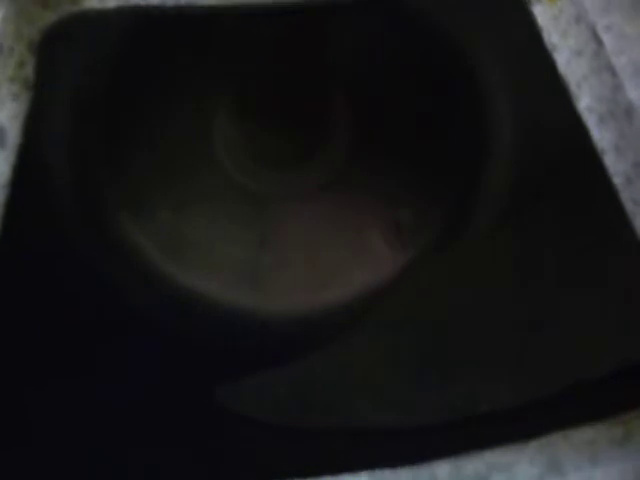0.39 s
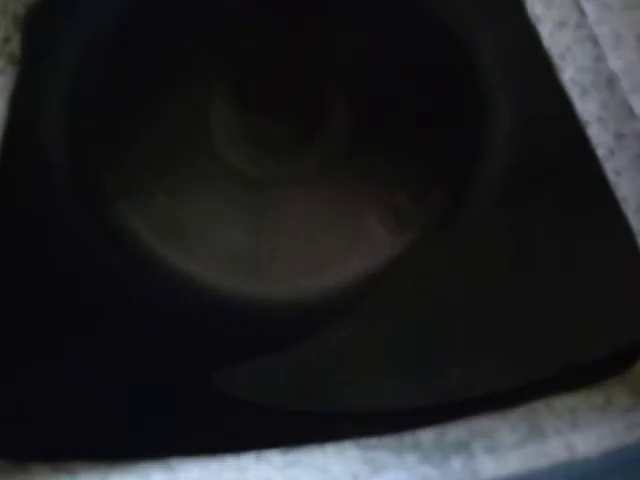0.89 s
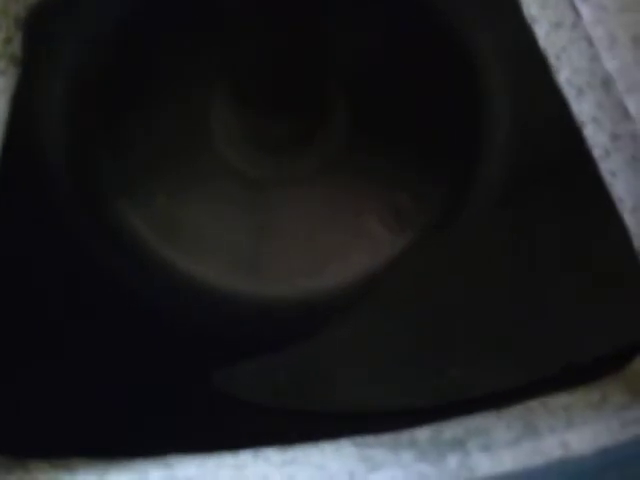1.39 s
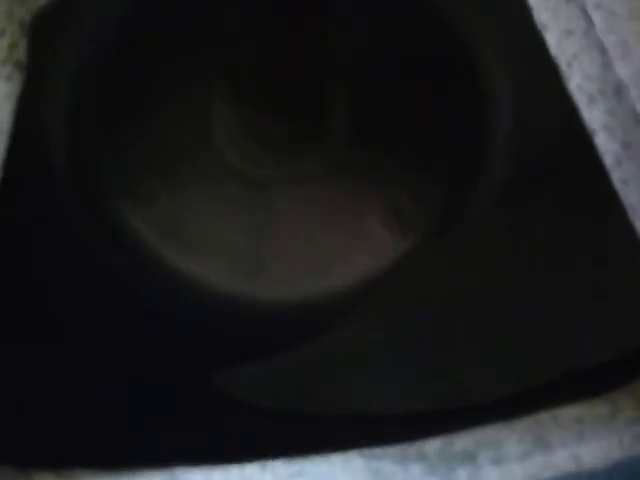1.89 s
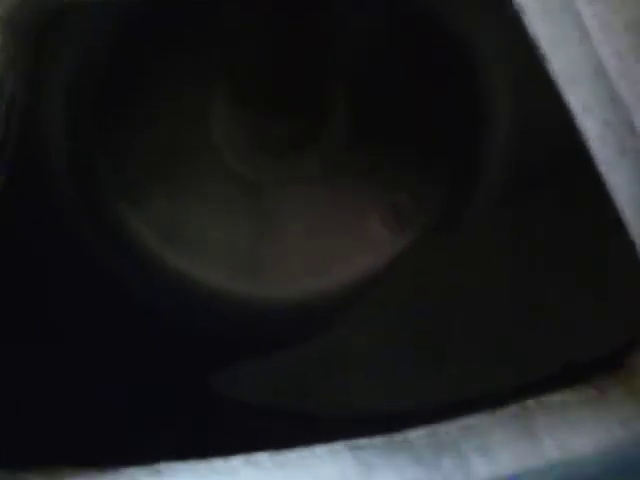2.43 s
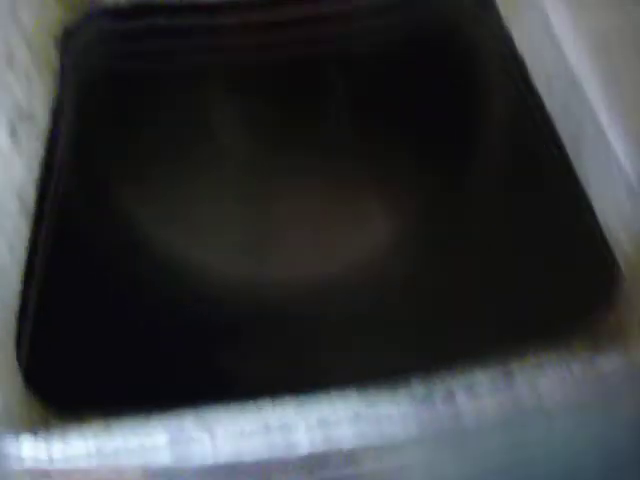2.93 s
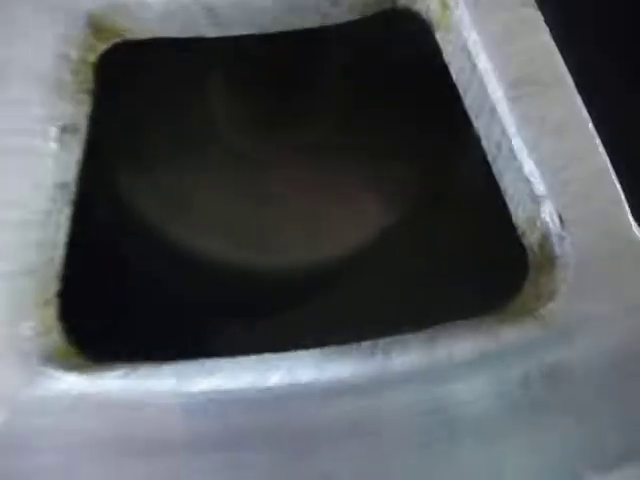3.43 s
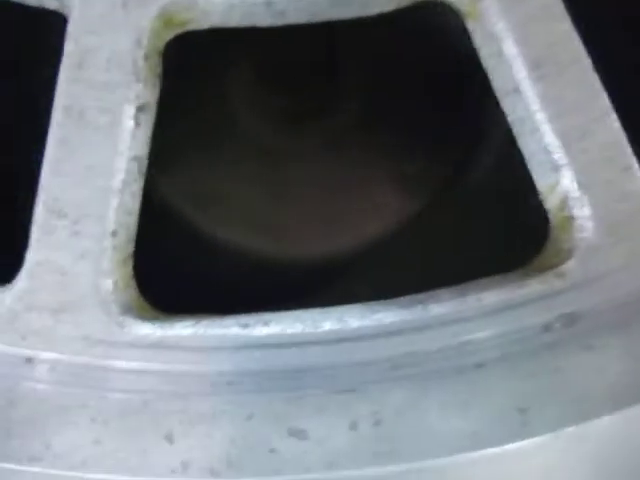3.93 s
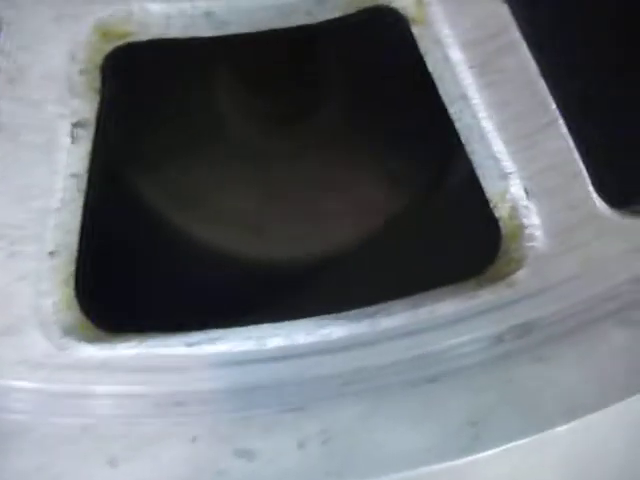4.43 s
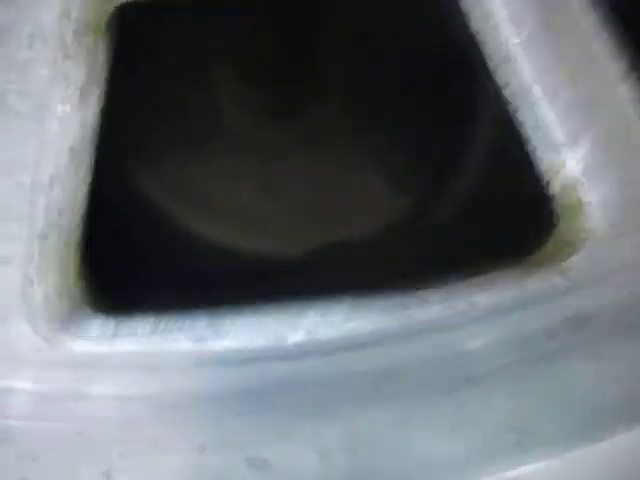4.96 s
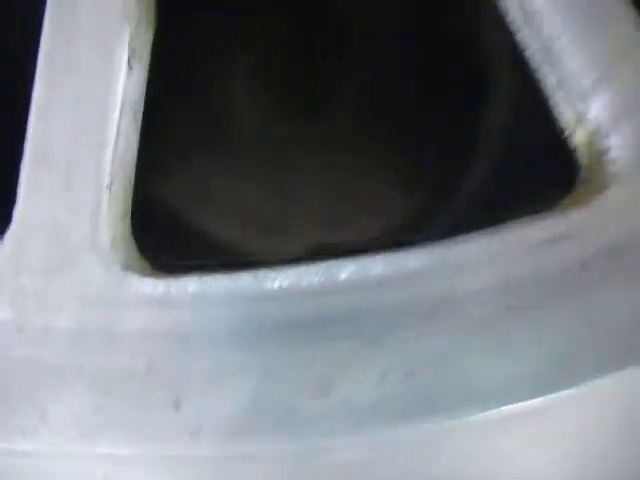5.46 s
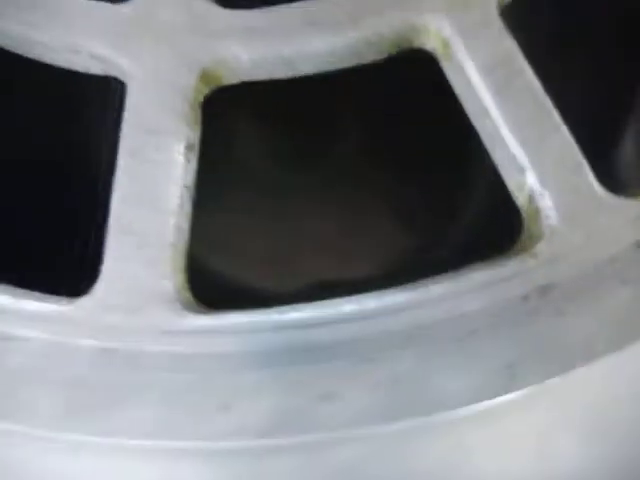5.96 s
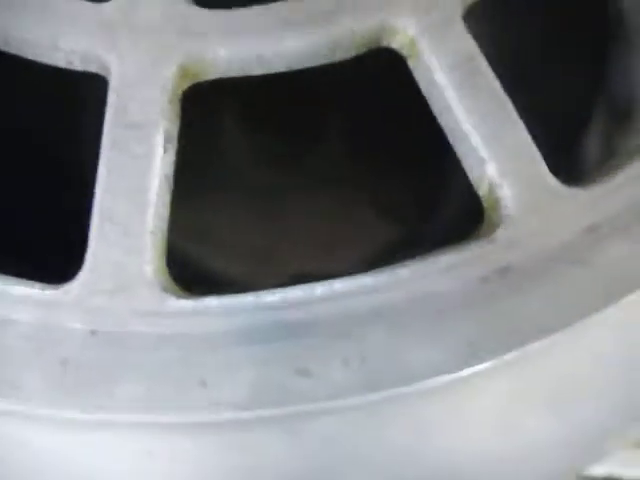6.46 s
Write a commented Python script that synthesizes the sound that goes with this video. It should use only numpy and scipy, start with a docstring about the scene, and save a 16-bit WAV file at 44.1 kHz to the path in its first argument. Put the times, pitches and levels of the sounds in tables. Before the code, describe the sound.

A handheld small microphone sits near a machine's metal vent in a workshop. Its motor runs at constant speed: low beating hum, resonant airy whirr, fine whistling whine that swells and fades. Short dull wind bumps and lumpy low rumble hit the microphone throughout, strongest in the last second and a half. A single dry tick of loose metal occurs past the middle. Bass and extreme treble are thin.

```python
"""A running cutter machine hums: a few close low tones beat, so the hum throbs.
Further steady low tones, a whirr of noise through the ringing housing and a fine whine of
shaft multiples belong to the machine too, and change in level with the nearness of the microphone.
A loose part ticks once against metal, made from quick ringing modes and a noise crack.
Moving air buffets the microphone: short low bursts over a lumpy stream of low noise."""
import sys
import numpy as np
from scipy import signal
from scipy.fft import rfft, irfft
from scipy.io import wavfile
from scipy.ndimage import uniform_filter1d

SR = 44100
rng = np.random.default_rng(int(sys.argv[2]) if len(sys.argv) > 2 else 0)


def makeup_ratio(level_db):
    """Linear amplitude ratio for a level in decibels (20 dB per factor of ten)."""
    decades = np.asarray(level_db, float) / 20
    return 10 ** decades


def generate_wav(signal):
    """Clip the signal to [-1, 1] and save it as 16-bit WAV at the path in sys.argv[1]."""
    frames = np.transpose(np.atleast_2d(signal))
    scaled = np.clip(frames, -1, 1) * 32767
    pcm = np.round(scaled).astype(np.int16)
    wavfile.write(sys.argv[1], SR, pcm)


N = 291060  # length in samples
SHAFT_HZ = 24.871  # turns of the shaft per second
IN_STEP_S = 0.44  # moment when all the hum tones are in step
FLICKER_DB = 0.6  # rms flicker of the whirr's treble

# The hum and its close neighbours, one list each: pitch_hz; level_db (rms)
HUM_HZ = [124.36, 123.08, 126.97, 128.32, 148.0, 149.2]
HUM_LEVEL_DB = [-28.5, -34.5, -40.5, -49, -43.5, -40.5]
# Steady low tones of shaft, blades and windings, one list each: pitch_hz; level_db (rms)
LOW_TONE_HZ = [298.46, 299.93, 517.2, 572, 590.46, 596.52, 599.84, 621.83, 624.74, 796.46, 846.21, 871.06,
               895.6, 920.82]
LOW_TONE_LEVEL_DB = [-51, -52, -45, -51, -48, -42, -43, -46, -44, -52, -43, -47, -56, -53]
# Nearness of the microphone, used relative to its average: time_s, level_db
NEARNESS = [(0, -35), (0.35, -32.5), (1.2, -31.5), (1.9, -32), (2.3, -33), (5.1, -33.5), (5.55, -37),
            (5.8, -36), (6.6, -36)]
# Colour of the whirr of air and bearings, relative: pitch_hz, level_db (per Hz)
WHIRR_COLOUR = [(30, -32.5), (80, -17.5), (140, -6.5), (300, -24.5), (450, -27.5), (700, -30), (950, -30),
                (1200, -23), (2100, -27), (2700, -30.5), (4500, -40), (5600, -46.5), (6600, -54.5),
                (7400, -68), (8500, -110)]
# Ringing modes of the housing, same order in both: pitch_hz; then width_hz, boost_db
HOUSING_HZ = [517, 615, 760, 812, 1065, 1160, 1220, 1330, 1410, 1450, 1580, 1715, 1745, 1895, 2090, 2300]
HOUSING_MODES = [(13.9, 23.5), (13.5, 27), (10, 5.5), (44.3, 20), (35, 13), (30, 6.5), (50, 6), (25, 4),
                 (20, 2.5), (49, 7), (17.7, 6), (25, 4), (15, 11), (26, 6.5), (40, 4.5), (60, -3.5)]
# Treble of the whirr against its body: time_s, level_db
WHIRR_TREBLE = [(0, -1), (1.499, 0.5), (3.4, 1), (4.901, -1.5), (5.4, 5.5), (5.55, -0.5), (6.6, -1)]
# General level of the whine, before random unevenness: pitch_hz, level_db (rms of each tone)
WHINE_COLOUR = [(2300, -82), (2550, -73), (2760, -66), (2880, -73), (2990, -67), (3300, -69), (3800, -74),
                (4300, -71), (5000, -78), (5500, -80), (6200, -86), (7000, -99), (7400, -110)]
# Strongest whine tones, replacing the general level: order (multiple of the shaft rate), level_db (rms)
STRONG_ORDERS = [(107, -54), (108, -50), (109, -58), (111, -62), (123, -61), (124, -63), (126, -60),
                 (129, -57), (130, -61), (133, -63), (137, -61), (138, -60), (139, -62), (140, -64),
                 (143, -65), (145, -63), (153, -65), (164, -68), (171, -66), (172, -65), (192, -67),
                 (208, -69), (209, -71), (210, -70)]
# Swell of the lowest, whistling whine tones, used relative to its average: time_s, level_db
WHISTLE_SWELL = [(0.0, -57), (0.35, -51.5), (1.0, -52), (1.7, -50), (3.2, -54), (3.4, -50.5), (4.65, -49.5),
                 (5.6, -60), (6.6, -62)]
# Tick of the loose part: start_s, level_db (peak)
TICKS = [(4.2394, -11)]
# Ringing modes of the tick, relative levels: pitch_hz, level_db, t60_s (time to fall 60 dB)
TICK_MODES = [(1060, -4.5, 0.025), (1400, -6, 0.022), (1606, 3, .025), (1850, -2.5, 0.028),
              (2290, -3.5, 0.016), (5850, -13, .04)]
# Large eddies, some overlapping or run together into one burst:
# middle_s, level_db (highest short-term rms), pitch_hz, nominal length_ms
THUMPS = [(0.353, -20, 234, 16), (0.477, -28, 230, 6), (0.634, -31, 239, 13), (0.808, -26, 260, 30),
          (0.889, -20.5, 270, 3.5), (1.321, -17, 270, 53), (1.4, -26.5, 265, 16), (1.618, -22.5, 249, 25),
          (1.741, -25.5, 248, 18), (1.93, -22, 218, 23), (2.127, -11.5, 250, 14), (2.319, -23, 259, 18),
          (2.463, -21.5, 255, 11), (2.499, -16.5, 308, 5.9), (2.92, -18, 243, 35), (2.949, -21.5, 248, 9.2),
          (3.111, -21.5, 217, 7), (3.142, -24.5, 300, 24), (3.383, -26, 198, 9.8), (3.471, -25, 271, 24),
          (3.763, -26, 265, 12), (3.805, -27, 333, 14), (3.987, -15.5, 214, 7.1), (4.067, -21.5, 230, 11),
          (4.107, -13, 236, 8.1), (4.175, -23.5, 200, 11), (4.346, -25.5, 320, 31),
          (4.406, -20.5, 250, 8.9), (4.847, -27, 260, 53), (5.014, -20.5, 230, 3), (5.131, -16, 240, 8.8),
          (5.141, -12.5, 407, 5.3), (5.153, -15.5, 230, 22), (5.296, -20, 253, 11), (5.343, -16, 264, 10),
          (5.373, -16.5, 250, 15), (5.399, -19, 320, 27), (5.419, -14, 330, 8.9), (5.456, -19, 394, 11),
          (5.485, -14, 224, 10), (5.517, -18, 372, 14), (5.553, -20, 230, 16), (5.637, -25, 208, 14),
          (5.714, -19, 254, 26), (5.741, -22.5, 236, 20), (5.944, -18, 231, 45), (5.992, -27, 240, 13),
          (6.034, -18, 258, 7.9), (6.058, -16.5, 322, 9.5), (6.085, -21.5, 270, 8.6),
          (6.126, -16.5, 235, 18), (6.262, -22, 312, 3.8), (6.297, -20.5, 220, 25),
          (6.417, -17.5, 227, 7.2)]
# Air stream on the microphone: time_s, level_db
GUST_LEVEL = [(0.0, -46), (0.5, -38), (1.05, -48), (1.3, -38), (1.7, -32.5), (1.97, -31.5), (2.6, -33.5),
              (3.05, -52), (3.95, -34.5), (4.5, -49.5), (4.95, -27.5), (5.2, -34), (5.4, -23),
              (5.53, -26.5), (5.7, -36), (6.05, -24.5), (6.2, -40), (6.36, -25), (6.6, -35.5)]
# Colour of the air stream, relative: pitch_hz, level_db (per Hz)
GUST_COLOUR = [(20, -37.5), (60, -14), (140, 6), (225, -2), (400, -12), (600, -18.5), (900, -33),
               (1500, -47.5), (3000, -90)]


def evened(x):
    """Scales a signal to rms 1."""
    return x / np.sqrt(np.mean(x ** 2) + 1e-20)


def read_colour(points, hz):
    """Reads a spectrum in between its points, on a log-frequency axis."""
    point_hz, value = np.transpose(points)
    return np.interp(np.log(hz + 1), np.log(point_hz + 1), value)


def curve(rows):
    """Reads a control curve at every sample."""
    time_s, value = np.transpose(rows)
    return np.interp(np.arange(N) / SR, time_s, value)


def steady_tones(pitch_hz, level_db, waver, drift_hz):
    """Tones of random phase; a narrow random skirt makes each one swell and fade by itself."""
    side = np.arange(-60, 61)  # neighbouring spectrum bins
    skirt = 1 / (1 + (side * SR / N / drift_hz) ** 2)
    real, imag = rng.standard_normal((len(pitch_hz), len(side), 2)).T
    shape = waver * (real + 1j * imag).T * skirt / np.sqrt(2 * np.sum(skirt ** 2))
    # the steady part sits in the middle bin
    shape += (side == 0) * np.exp(2j * np.pi * rng.random((len(pitch_hz), 1)))
    level = makeup_ratio(np.asarray(level_db))[:, None] / np.sqrt(1 + waver ** 2)
    bins = np.round(np.asarray(pitch_hz) * N / SR).astype(int)[:, None] + side
    spectrum = np.zeros(N // 2 + 1, complex)
    np.add.at(spectrum, bins, shape * level)
    return irfft(spectrum, N) * N / np.sqrt(2)


def hum():
    """Close tones fall in and out of step, so the hum throbs a little faster than once a second."""
    t = np.arange(N) / SR - IN_STEP_S
    return sum(np.sqrt(2) * makeup_ratio(level_db) * np.cos(2 * np.pi * pitch_hz * t)
               for pitch_hz, level_db in zip(HUM_HZ, HUM_LEVEL_DB))


def low_tones():
    """Shaft, blades and windings sound steady low tones that waver slightly."""
    return steady_tones(LOW_TONE_HZ, LOW_TONE_LEVEL_DB, waver=0.35, drift_hz=1.5)


def whirr():
    """Noise of air and bearings rings the housing, in drifting patches, pulsing once a turn."""
    size, hop = 4096, 1024  # samples
    frames, hz = N // hop + 5, np.fft.rfftfreq(size, 1 / SR)
    real, imag, patches = rng.standard_normal((frames, len(hz), 3)).T
    # smooth the patches over pitch, then over time
    patches = uniform_filter1d(patches, 30, 0)
    patches_db = 1.04 * evened(uniform_filter1d(patches, 6, 1))
    ringing = 1 + sum(makeup_ratio(boost_db) ** 2 / (1 + (2 * (hz - pitch_hz) / width_hz) ** 2)
                      for pitch_hz, (width_hz, boost_db) in zip(HOUSING_HZ, HOUSING_MODES))
    colour_db = read_colour(WHIRR_COLOUR, hz)[:, None]
    spectrum = (real + 1j * imag) * makeup_ratio(colour_db + patches_db) * np.sqrt(ringing)[:, None]
    flicker = evened(uniform_filter1d(rng.standard_normal(frames), size=3))
    treble_db = np.interp(np.arange(frames) * hop / SR, *np.transpose(WHIRR_TREBLE))
    treble_db = treble_db + FLICKER_DB * flicker
    # the treble change sets in around 3500 Hz
    spectrum *= makeup_ratio(treble_db / (1 + (3500 / (hz[:, None] + 1)) ** 4))
    noise = signal.istft(spectrum, nperseg=size, noverlap=size - hop)[1][:N]
    pulse = 1 + 0.1 * np.cos(2 * np.pi * SHAFT_HZ * np.arange(N) / SR)
    return makeup_ratio(-28.5) * evened(noise) * pulse


def whine(near_db):
    """The same rubbing pattern returns every turn: a comb of shaft multiples of uneven height."""
    orders = np.arange(92, 298)
    pitch_hz = orders * SHAFT_HZ
    uneven_db = np.clip(4 * rng.standard_normal(len(orders)), -12, 4)
    level_db = read_colour(WHINE_COLOUR, pitch_hz) + uneven_db
    for order, order_db in STRONG_ORDERS:
        level_db[round(order) - orders[0]] = order_db
    low = orders < 116
    # the lowest group is beamed, so it swells as the camera turns
    swell_db = curve(WHISTLE_SWELL)
    whistle = steady_tones(pitch_hz[low], level_db[low], waver=0.35, drift_hz=2.5)
    whistle = whistle * makeup_ratio(swell_db - swell_db.mean())
    upper = steady_tones(pitch_hz[~low], level_db[~low], waver=0.55, drift_hz=4)
    return whistle + upper * makeup_ratio(near_db)


def ticks():
    """A loose part strikes metal: a short crack and quick modes; a duller bounce rings the low ones again."""
    t, out = np.arange(4000) / SR, np.zeros(N + 4000)
    modes = sum(makeup_ratio(level_db - 60 * t / t60_s) * np.sin(2 * np.pi * pitch_hz * t)
                for pitch_hz, level_db, t60_s in TICK_MODES)
    bounce = signal.sosfilt(signal.butter(4, 2400, fs=SR, output="sos"), modes)
    band = signal.butter(4, [900, 5200], "bandpass", fs=SR, output="sos")
    noises = rng.standard_normal((len(TICKS), len(t)))
    for (start_s, level_db), noise in zip(TICKS, noises):
        crack = 3 * uniform_filter1d(noise, size=7) * makeup_ratio(-60 * t / 0.008)
        tick = modes + crack
        tick[200:] += 1.5 * bounce[:-200]  # 200 samples, about 4.5 ms later
        tick = signal.sosfilt(band, tick)
        out[round(start_s * SR):][:len(t)] += makeup_ratio(level_db) * tick / abs(tick).max()
    return out[:N]


def thumps():
    """Large eddies push the diaphragm for a few ragged cycles: a low swell with a short, brighter core."""
    half = 2048  # samples on each side of the middle
    t, out = np.arange(-half, half) / SR, np.zeros(N + 2 * half)
    hz = np.fft.rfftfreq(len(t), 1 / SR) + 1
    noises = rng.standard_normal((len(THUMPS), len(t)))
    for (middle_s, level_db, pitch_hz, length_ms), noise in zip(THUMPS, noises):
        octaves = np.log2(hz / pitch_hz)
        # gentle slope below the pitch, steep above it, with the deep bass cut
        low_db = np.where(octaves < 0, 1.8 * octaves, -20 * octaves ** 2)
        low = makeup_ratio(low_db) / (1 + (75 / hz) ** 3)
        bright = makeup_ratio(-15 * (octaves - 0.35) ** 2)
        spread = (t / (0.62 * length_ms / 1000)) ** 2
        envelope = np.exp(-spread) + 0.46 * np.exp(-spread / 7)
        swell = irfft(rfft(noise * envelope) * low)
        # random sign and phase for the core, moved to the middle
        core = np.sign(noise[0]) * np.roll(irfft(bright * np.exp(1j * noise[1])), half)
        share = 1.3 * (pitch_hz / 350) ** 3  # fast eddies snap harder
        burst = swell / abs(swell).max() + share * core / abs(core).max()
        burst = burst * np.hanning(len(t))
        power = uniform_filter1d(burst ** 2, 300).max()
        out[round(middle_s * SR):][:len(t)] += makeup_ratio(level_db) * burst / np.sqrt(power)
    return out[half:N + half]


def gusts():
    """Small eddies stream over the microphone: lumpy low noise."""
    lumps = uniform_filter1d(rng.standard_normal(N), 300)
    lumps_db = 7.4 * evened(uniform_filter1d(lumps, 300))
    lumpy_noise = rng.standard_normal(N) * makeup_ratio(lumps_db)
    colour = makeup_ratio(read_colour(GUST_COLOUR, np.fft.rfftfreq(N, 1 / SR)))
    eddies = evened(irfft(rfft(lumpy_noise) * colour, N))
    return eddies * makeup_ratio(curve(GUST_LEVEL))


def scene():
    """Hum, tones, whirr and upper whine follow the nearness; moving air acts on the microphone alone."""
    near_db = curve(NEARNESS)
    near_db = near_db - near_db.mean()
    bass = (hum() + low_tones()) * makeup_ratio(0.91 * near_db)
    machine = bass + whirr() * makeup_ratio(near_db) + whine(near_db)
    mix = machine + ticks() + thumps() + gusts()
    return mix[None]  # one channel


def roll_off(x):
    """The treble ends steeply here."""
    return signal.sosfilt(signal.butter(12, 7300, fs=SR, output="sos"), x)


def record(dry):
    """A small camera cuts the bass, limits the band steeply and has a narrow notch in the low treble."""
    hz = np.fft.rfftfreq(N, 1 / SR) + 1e-9
    off = (hz - 2888) / 110  # distance from the notch centre
    notch = np.sqrt((off ** 2 + makeup_ratio(-38) ** 2) / (off ** 2 + 1))
    limits = 1 / np.sqrt((1 + (45 / hz) ** 4) * (1 + (hz / 7600) ** 40))
    filtered = irfft(rfft(dry) * notch * limits, N)
    hiss = makeup_ratio(-100) * rng.standard_normal(dry.shape)
    return roll_off(filtered + hiss)


dry = scene()
out = record(dry)
generate_wav(out)
```